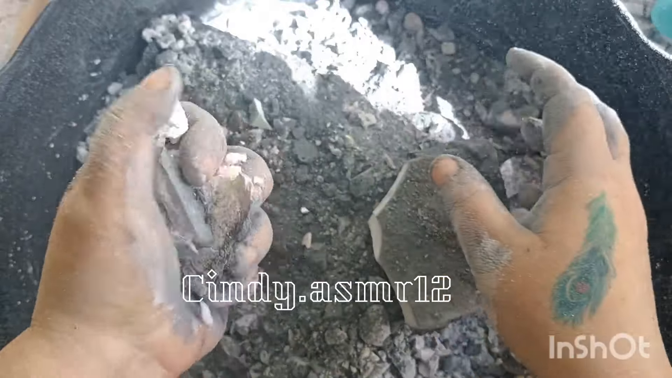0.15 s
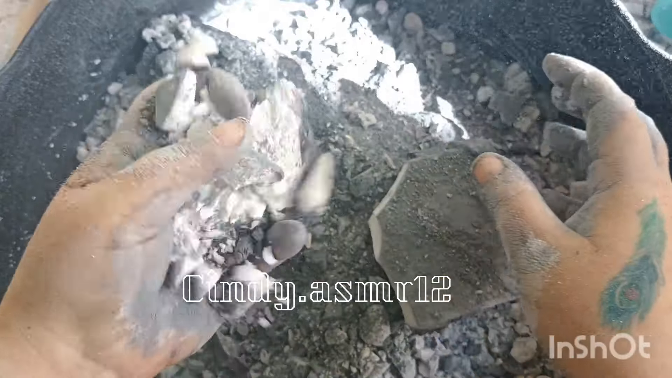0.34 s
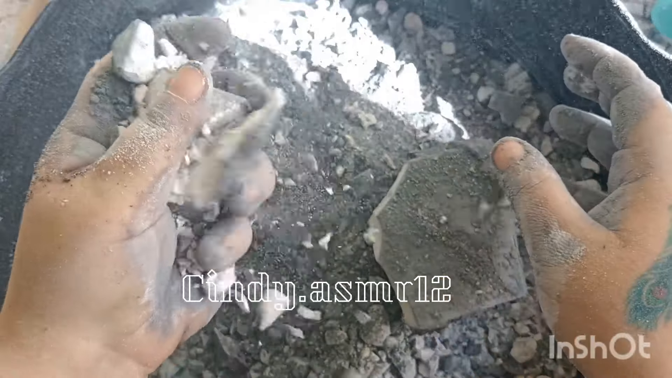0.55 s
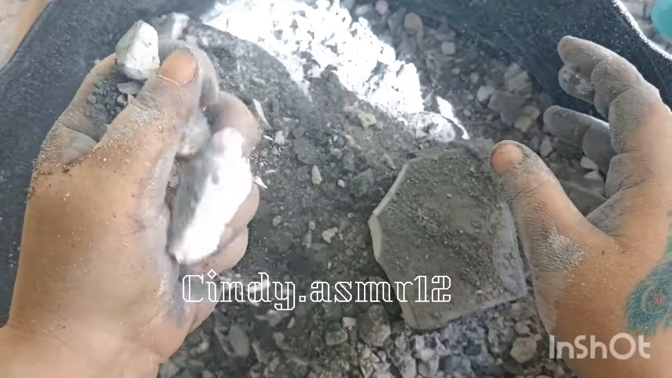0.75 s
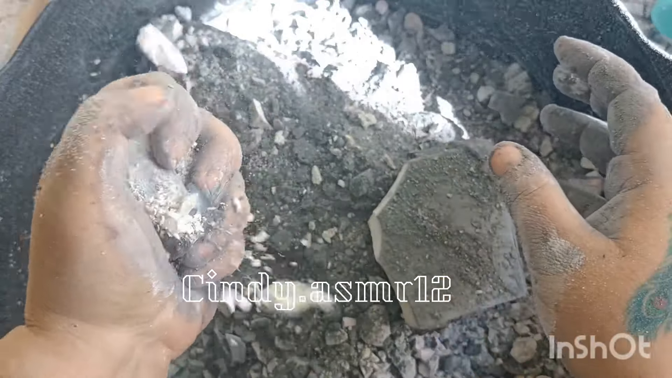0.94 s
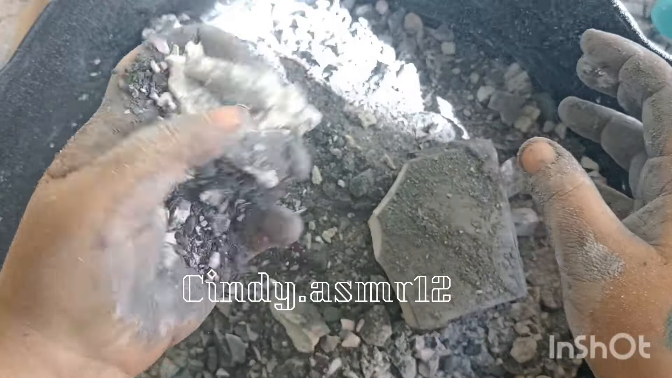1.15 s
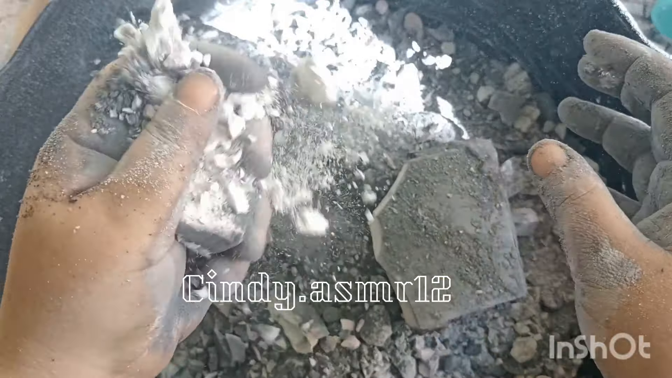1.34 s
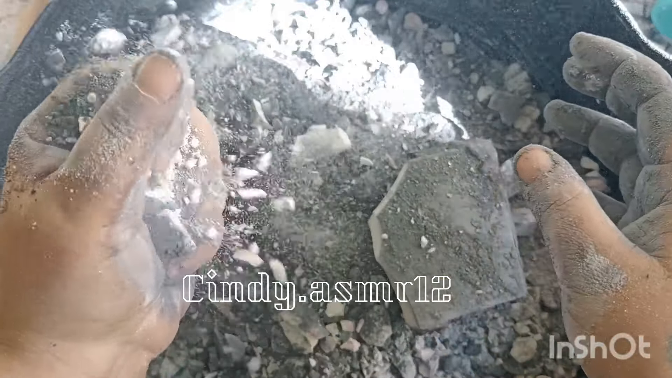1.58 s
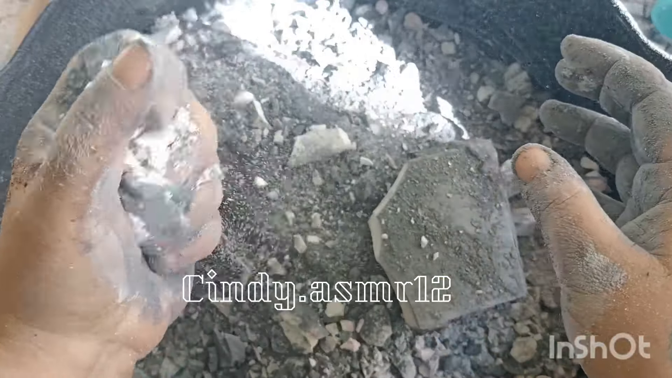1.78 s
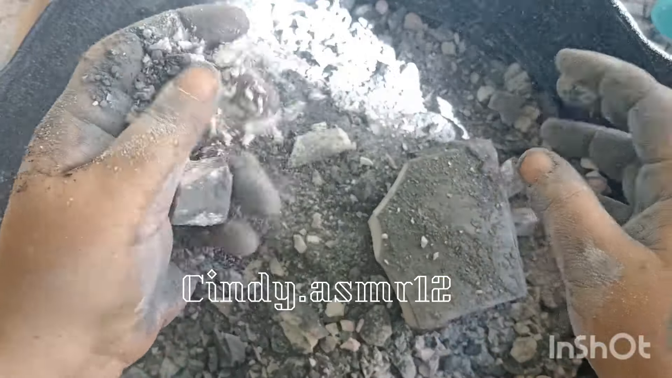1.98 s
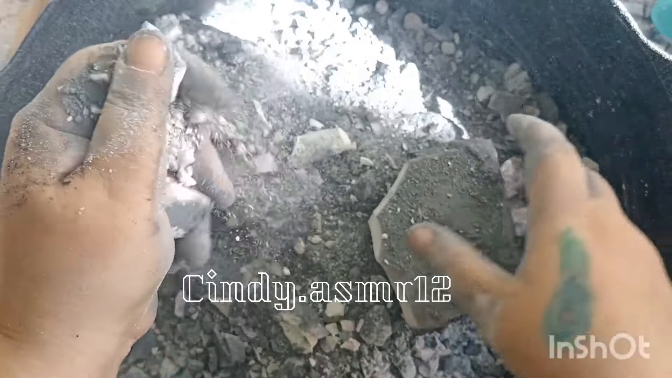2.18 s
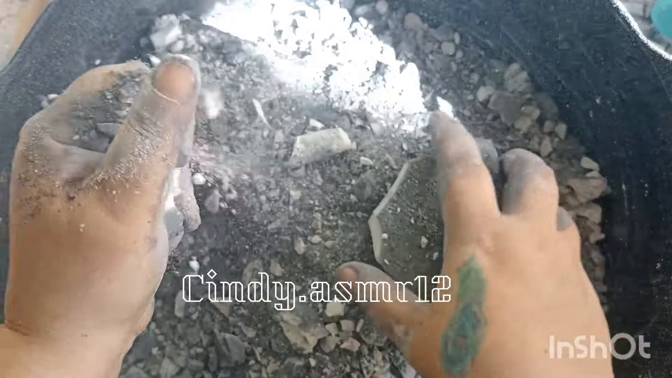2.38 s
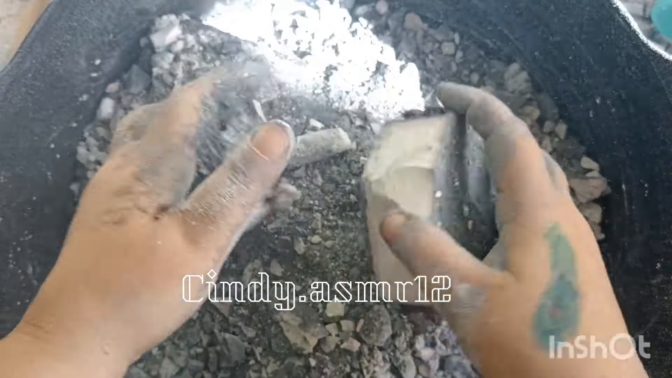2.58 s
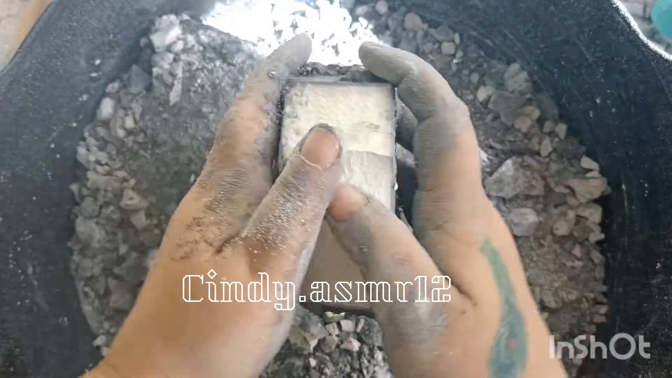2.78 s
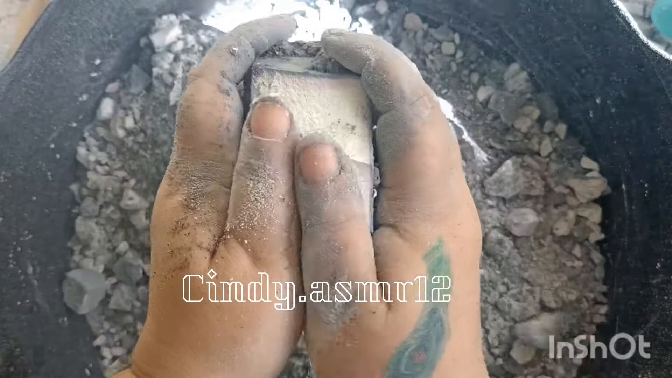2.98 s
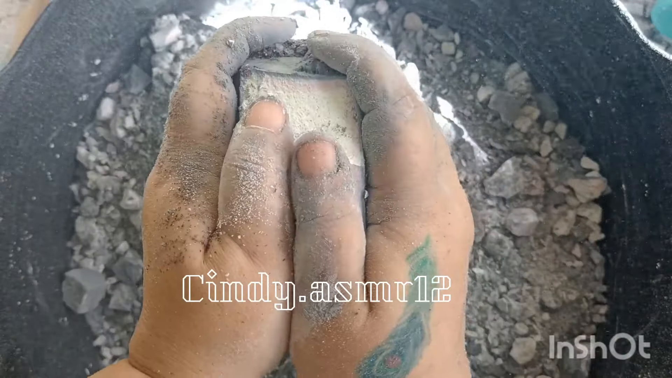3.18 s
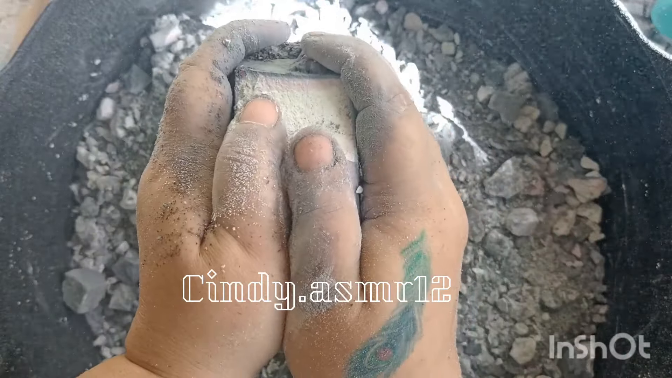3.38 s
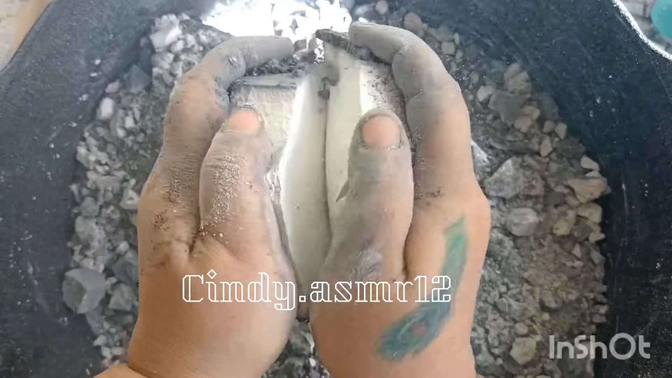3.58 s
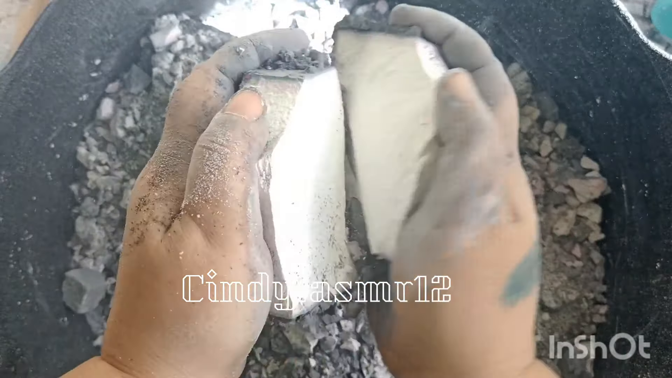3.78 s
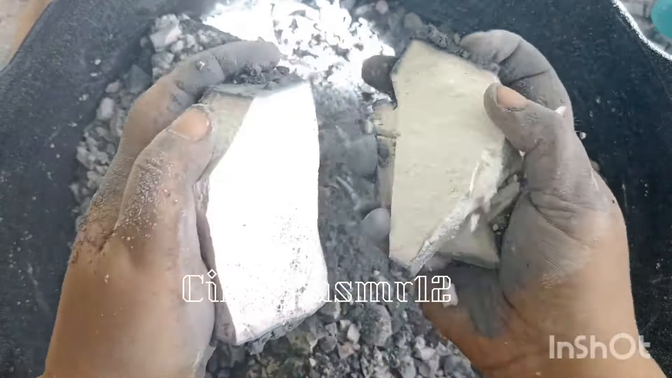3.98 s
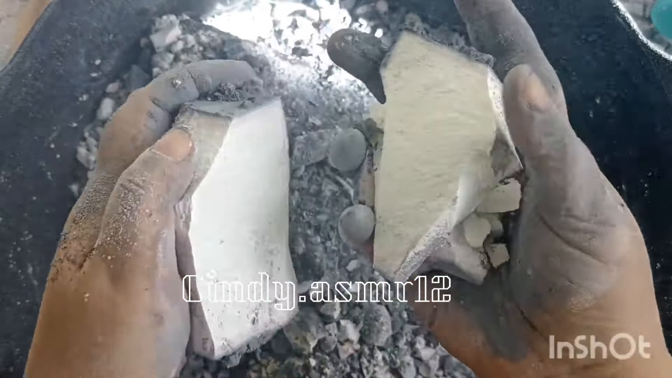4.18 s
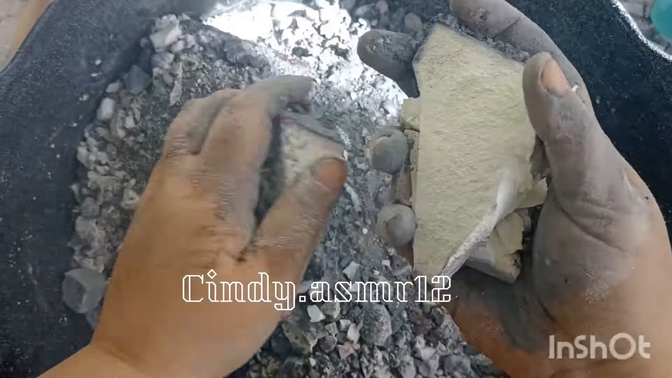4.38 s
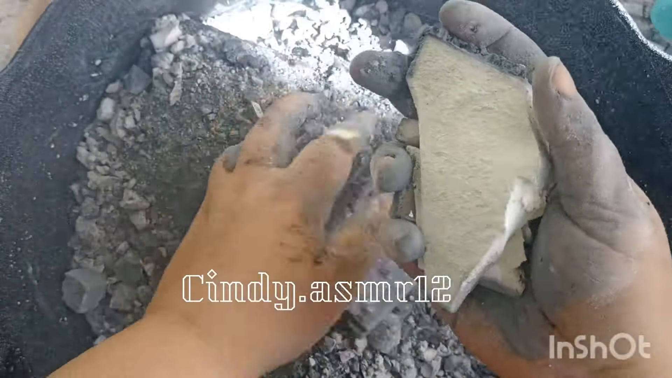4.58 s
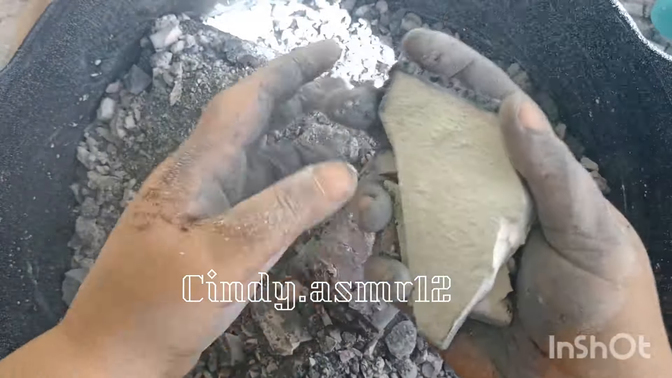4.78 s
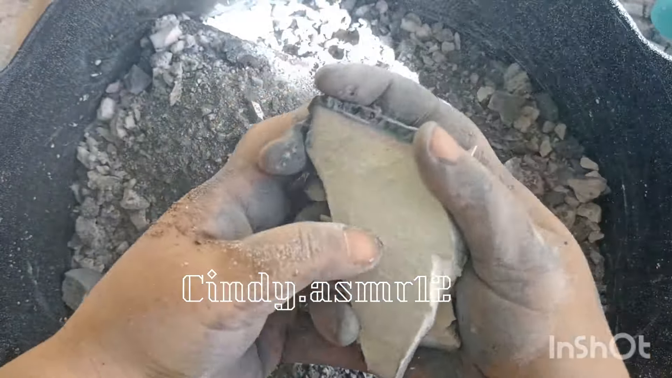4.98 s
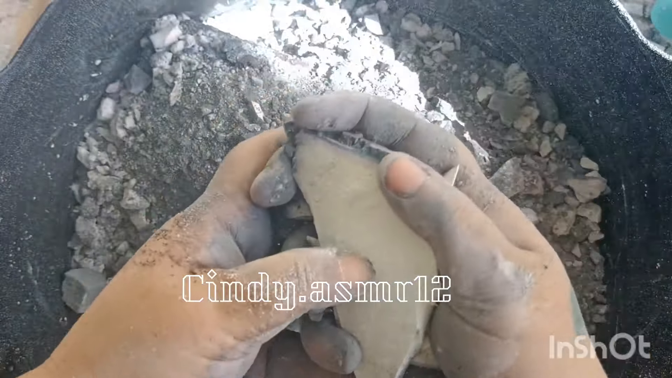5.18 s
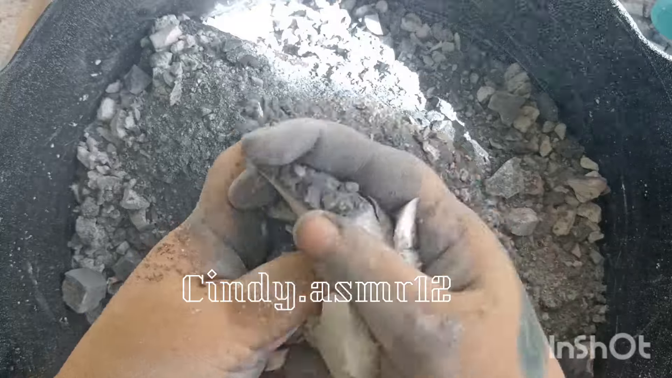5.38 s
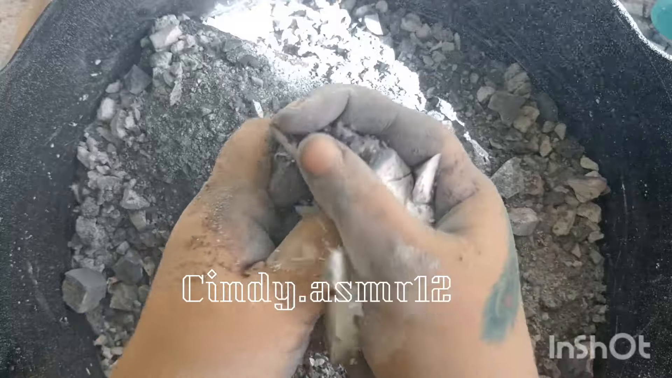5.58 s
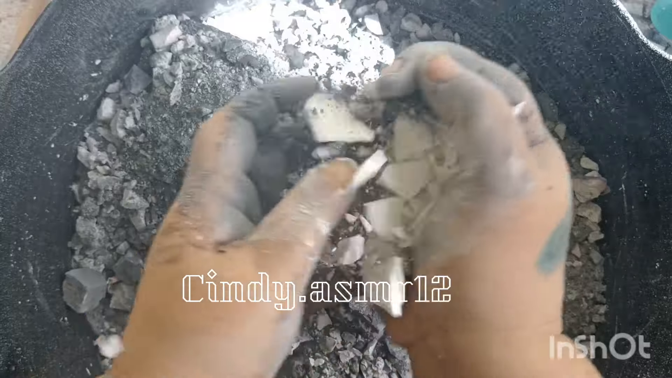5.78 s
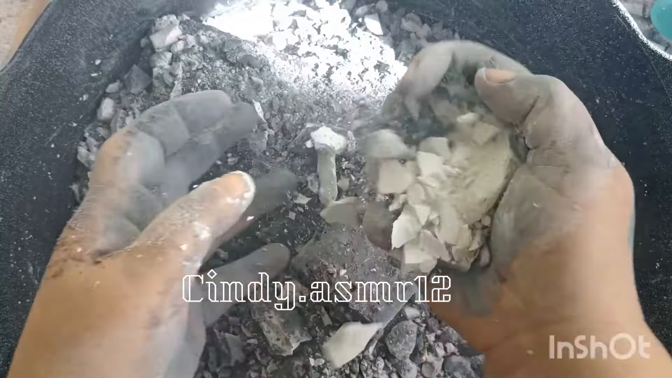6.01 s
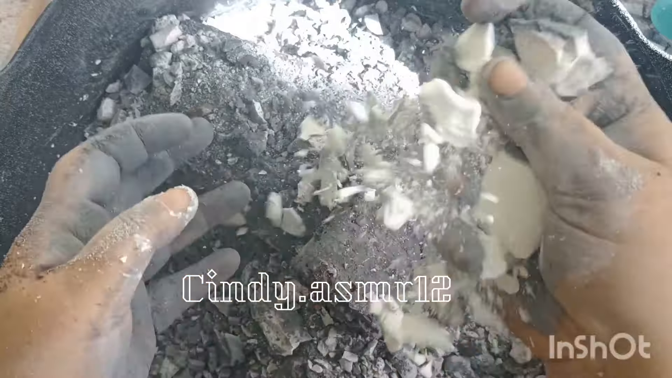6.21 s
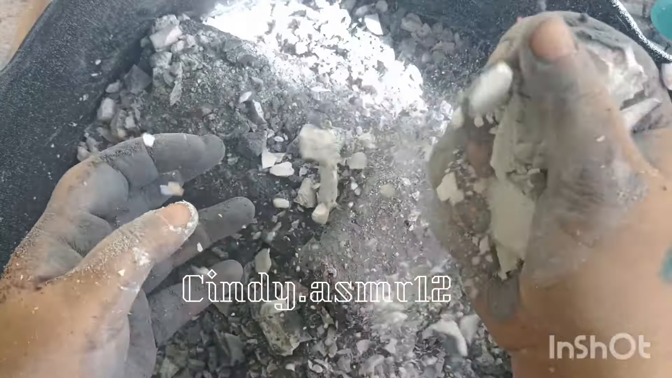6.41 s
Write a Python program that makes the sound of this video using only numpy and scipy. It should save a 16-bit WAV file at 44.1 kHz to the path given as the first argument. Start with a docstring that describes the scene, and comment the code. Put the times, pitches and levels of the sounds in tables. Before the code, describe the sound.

Dry chalk blocks are snapped and crushed by hand over a tub, with sharp cracks, gritty crumbling, powdery hiss and dull thuds of falling lumps.

```python
"""In a small room, close to the microphone, dry chalk blocks are snapped and crushed by hand over a plastic
tub. Each fracture is a sudden release and a burst of tearing noise, with a dull piece, a bright edge and shed
grains; loose pieces also clack dully against each other. Between them grit grinds and powder hisses as clumped
random clicks; flat faces squeak as wavering tones. Lumps thud into the tub through its resonances, two hard
shards clink in decaying sine modes, and filtered noise gives the rumble of the tub and the faint hiss of the
room."""
import sys
import numpy as np
from scipy import signal
from scipy.fft import rfft, irfft
from scipy.io import wavfile
from scipy.ndimage import uniform_filter1d

SR = 44100
rng = np.random.default_rng(int(sys.argv[2]) if len(sys.argv) > 2 else 0)


def to_wav(s):
    """Save 16-bit WAV."""
    ch = np.atleast_2d(s).T  # columns
    pcm = np.round(np.clip(ch, -1, 1) * 32767)  # PCM
    wavfile.write(sys.argv[1], SR, pcm.astype(np.int16))


N = 284445  # length in samples

# Fractures, and pieces of chalk knocking dully against each other (the rows with almost no edge). Each row:
# start in seconds, pitch of the piece in Hz, level of the piece in dB, level of the snapping edge in dB.
CRACKS_AND_CLACKS = [(0.0266, 2270, -23.5, -20), (0.071, 2820, -26, -19.5), (0.424, 2140, -29, -18.5),
                     (0.4645, 2070, -33, -16), (0.4684, 2700, -19, -37), (0.5289, 2000, -24, -24),
                     (0.538, 1780, -22, -19), (0.6091, 2250, -38, -21), (0.667, 1660, -28.5, -34),
                     (0.6888, 2200, -47, -25.5), (0.723, 1990, -31, -24), (0.7537, 1940, -43, -17),
                     (0.789, 1603, -20, -29), (0.835, 2800, -22, -24), (0.9496, 1677, -21, -32),
                     (1.0264, 2330, -35, -37), (1.059, 1900, -33.5, -49), (1.29, 2160, -33, -48),
                     (1.3297, 1850, -23, -27), (1.404, 1820, -14, -31), (1.415, 1850, -31, -32),
                     (1.4256, 2720, -19, -20), (1.4383, 1270, -18, -21.5), (1.5968, 2130, -47, -28),
                     (1.651, 2160, -32.5, -32), (1.74, 1770, -17, -34), (1.7896, 1490, -28, -44.5),
                     (1.9974, 2660, -15.5, -24.5), (2.033, 2600, -22, -24), (2.0685, 2240, -20.5, -22),
                     (2.142, 1410, -32.5, -33), (2.663, 1630, -18.5, -61), (2.8103, 1275, -20.5, -64),
                     (2.9056, 1810, -31, -44), (2.9302, 1420, -24.5, -49), (2.9899, 1292, -21, -57),
                     (3.4488, 2200, -10.5, -13.5), (3.4647, 2160, -28, -35), (3.4746, 1860, -13.5, -15),
                     (3.482, 1930, -26, -21), (3.6012, 1730, -25.5, -55), (3.661, 1700, -33.5, -57),
                     (3.6773, 2000, -28, -37), (4.236, 1910, -34.5, -34.5), (4.357, 2070, -31, -45),
                     (4.4638, 2020, -20, -47), (4.4752, 1880, -25, -38), (4.4826, 2000, -23.5, -37),
                     (4.4896, 1870, -21, -32.5), (4.498, 1680, -24, -43), (4.5467, 1620, -25.5, -60),
                     (4.7335, 2000, -32.5, -33.5), (5.051, 2140, -13.5, -9.5), (5.1017, 2400, -39, -13.5),
                     (5.16, 2930, -34, -14.5), (5.2163, 1816, -9.5, -11), (5.239, 2020, -13.5, -19),
                     (5.243, 1940, -16.5, -15), (5.256, 2000, -22, -14.5), (5.272, 2540, -23, -23),
                     (5.293, 2150, -33, -21.5), (5.4515, 2580, -37, -23.5), (5.458, 1760, -20, -22.5),
                     (5.5024, 2180, -20, -15.5), (5.512, 2650, -20, -36), (5.524, 2400, -32, -24),
                     (5.544, 2090, -15.5, -25), (5.5645, 2640, -19, -19.5), (5.6212, 2100, -15.5, -22.5),
                     (5.716, 2760, -36, -19.5), (5.8401, 2360, -16, -22.5), (5.876, 1660, -21, -45),
                     (5.8875, 2240, -21, -28), (5.9307, 2217, -12.5, -15.5), (6.1467, 2780, -27, -25),
                     (6.1716, 2130, -19, -17), (6.209, 2910, -30, -28), (6.392, 1460, -14.5, -24),
                     (6.4019, 1490, -20, -28), (6.409, 1320, -22, -33), (6.418, 1560, -25, -39)]
# Bright edge of breaking chalk, also the colour of powder. Each row: frequency in Hz, density in dB per Hz.
EDGE_SPECTRUM = [(3000, -2.5), (4000, -7.5), (5000, 2.5), (6200, 0.5), (7000, -5.5), (7900, -11),
                 (9200, -10.5), (12000, -18.5), (15500, -23)]
# a soft piece gives almost nothing above this multiple of its pitch
PIECE_TOP_RATIO = 1.54


def cracks(tear_t60, tear_share, piece_ratio, ring_share, ring_t60, size=2048, count=4):
    """A sudden release, then a few milliseconds of tearing: the piece knocks dully and the edge snaps brightly."""
    out, t = np.zeros(N), np.arange(size) / SR
    span = SR // 250  # levels are judged over the first 4 ms
    for s, hz, piece_db, snap_db in CRACKS_AND_CLACKS:
        force = tear_share * rng.standard_normal((2, size)) * from_db(-60 * t / tear_t60)
        force[:, 0] += 1  # the release
        piece = band(force[0], hz, piece_ratio)
        piece = rms_one(dull(piece, hz * PIECE_TOP_RATIO), span)
        snap = rms_one(colour(force[1], EDGE_SPECTRUM, size=512), span)
        # every piece has a shape, and so a few short-lived modes, of its own
        modes = hz * 2 ** rng.uniform(-0.23, 0.45, (count, 1))
        ring = np.cos(2 * np.pi * modes * t).sum(axis=0) * from_db(-60 * t / ring_t60)
        body = rms_one(piece + ring_share * ring, span)
        add(out, s, from_db(piece_db) * body + from_db(snap_db) * snap)
    return out


# Lumps and hands hitting the heap. Each row: start in seconds, pitch in Hz, level in dB,
# t60 of the settling noise in seconds.
HEAP_KNOCKS = [(0.539, 835, -27.5, 0.021), (0.618, 390, -35.5, 0.49), (0.952, 433, -35, 0.059),
               (1.156, 616, -30.5, 0.032), (1.403, 710, -29.5, 0.028), (1.741, 740, -26.5, 0.082),
               (2.568, 412, -32, 0.29), (2.81, 486, -28.5, 0.22), (2.931, 454, -22.5, 0.1),
               (2.933, 840, -26.5, 0.16), (2.991, 524, -15.5, 0.059), (2.99, 190, -23, 0.15),
               (2.993, 332, -15.5, 0.04), (3.191, 445, -35, 0.049), (3.447, 510, -32, 0.035),
               (3.474, 406, -27, 0.045), (3.719, 890, -33, 0.078), (3.909, 700, -35, 0.034),
               (4.243, 715, -38.5, 0.027), (4.4633, 393, -25.5, 0.092), (4.48, 325, -21.5, 0.052),
               (4.495, 235, -30.5, 0.34), (4.496, 73.5, -36, 0.5), (4.546, 730, -26, 0.069),
               (4.697, 860, -40, 0.035), (4.7329, 683, -30, 0.013), (5.238, 368, -26, 0.049),
               (5.928, 930, -26, 0.086), (6.178, 568, -17, 0.095), (6.394, 540, -25, 0.11)]
# Resonances of the filled tub. Each row: frequency in Hz, width in Hz, gain in dB.
TUB_RESONANCES = [(190, 135, 3.5), (323, 45, 3.5), (390, 26, -6.5)]


def knocks(settle_share, band_ratio, clunk_share, size=8192):
    """A lump lands with a short hollow clunk and settles in the heap; the blow rings in the tub."""
    out, t = np.zeros(N), np.arange(size) / SR
    for s, hz, level_db, t60 in HEAP_KNOCKS:
        force = settle_share * rng.standard_normal(size) * from_db(-60 * t / t60)
        force[0] += 1  # the impact
        blow = dull(band(force, hz, band_ratio), hz * 2)
        blow = blow + clunk_share * resonate(blow, hz, hz / 5)
        tub = sum(from_db(db) * resonate(blow, f, width) for f, width, db in TUB_RESONANCES)
        add(out, s, from_db(level_db) * rms_one(blow + tub, SR // 50))
    return out


# Hard shards touching. Each row: start in seconds, level in dB.
SHARD_CLINKS = [(5.8765, -24), (5.888, -20)]
# Modes of a struck shard. Each row: frequency in Hz, level in dB, t60 in seconds.
SHARD_MODES = [(2000, 0, 0.013), (3305, 0.5, 0.026), (5340, 1, 0.023), (7330, 1.5, 0.064)]


def clinks():
    """A hard shard rings briefly in its own modes."""
    out, t = np.zeros(N), np.arange(SR // 8) / SR
    ring = sum(from_db(db - 60 * t / t60) * np.sin(2 * np.pi * hz * t) for hz, db, t60 in SHARD_MODES)
    for s, level_db in SHARD_CLINKS:
        add(out, s, from_db(level_db) * ring)
    return out


# Squeezes of the hand. Each row: time of full strength in seconds, hold in seconds, level of grit in dB,
# level of powder in dB, level of coarse crumbs in dB.
HAND_SQUEEZES = [(0.0, 0.05, -43, -39, -52.5), (0.31, 0.53, -44, -50, -50.5), (0.425, 0.072, -34, -32, -37),
                 (0.56, 0.076, -40, -39.5, -40), (0.687, 0.12, -36, -36, -45.5),
                 (0.945, 0.0049, -44.5, -45, -48), (1.019, 0.012, -46, -53, -44.5),
                 (1.145, 0.094, -50.5, -55.5, -46.5), (1.264, 0.12, -36, -42.5, -43.5),
                 (1.419, 0.056, -35.5, -35, -38), (1.591, 0.098, -44, -49, -48.5),
                 (1.984, 0.17, -40, -44, -43), (2.438, 0.014, -49.5, -50.5, -40.5),
                 (2.544, 0.037, -36, -42, -36), (2.646, 0.13, -47, -57, -43.5),
                 (3.447, 0.062, -24, -29.5, -35), (3.538, 0.2, -42, -48.5, -53.5),
                 (3.806, 0.085, -35, -35, -48), (4.024, 0.037, -43, -46.5, -46.5),
                 (4.456, 0.03, -37, -46, -36), (4.993, 0.0057, -42.5, -41.5, -50),
                 (5.055, 0.12, -32, -31.5, -57), (5.217, 0.06, -24, -28.5, -40.5),
                 (5.3, 0.16, -41, -41.5, -54), (5.42, 0.14, -38, -38.5, -43.5),
                 (5.501, 0.071, -31.5, -29, -47), (5.623, 0.098, -37, -40.5, -74),
                 (5.926, 0.061, -38, -40, -41), (6.103, 0.49, -35.5, -37.5, -42.5),
                 (6.169, 0.082, -36.5, -43, -36), (6.39, 0.06, -33.5, -40, -37)]
# dusty fingers never quite rest: level of each grain size between squeezes (dB)
RESTLESS_DB = -64.5


def grinding():
    """Strength of grit, powder and coarse crumbs; overlapping squeezes add in power."""
    rows = np.array(HAND_SQUEEZES)
    power = np.array([effort(start, hold) for start, hold in rows[:, :2]]) ** 2
    grain_power = from_db(rows[:, 2:]).T ** 2
    return np.sqrt(grain_power @ power + from_db(RESTLESS_DB) ** 2)


# every squeeze builds up, eases as the chalk gives way, then trickles out; a long squeeze builds more slowly
BUILD_DB_PER_HOLD, EASE_DB_PER_S, TRICKLE_DB_PER_S = 167, 11.5, 218


def effort(start, hold):
    """Gain of one push of the hand over time: build-up to the start, easing hold, release."""
    t = np.arange(N) / SR - start
    build = BUILD_DB_PER_HOLD * np.minimum(t / hold, 0)
    ease = EASE_DB_PER_S * np.clip(t, 0, hold)
    trickle = TRICKLE_DB_PER_S * np.maximum(t - hold, 0)
    return from_db(np.maximum(build - ease - trickle, -120))


# Colour of the coarse crumbs. Each row: frequency in Hz, density in dB per Hz.
CRUMB_SPECTRUM = [(200, 3), (340, -4), (1000, -2), (1400, -1.5)]
# Colour of the grit. Each row: frequency in Hz, density in dB per Hz.
GRIT_SPECTRUM = [(800, -17), (1200, -12), (1750, 1), (2400, -1.5), (3300, -5.5), (4100, -6.5),
                 (5200, -12.5)]


def crumbling(grit_flow, powder_flow, crumb_flow, shed_db, shed_t60):
    """Three grain sizes follow the squeeze; each fracture or clack crackles as it starts to yield and then
    sheds grains."""
    yield_s = .002  # the crackle swells for this long before the fracture
    t = np.arange(SR // 4) / SR - yield_s
    swell = np.minimum(1 + t / yield_s, 1) ** 2
    spray = from_db(shed_db - 60 * np.maximum(t, 0) / shed_t60) * swell
    shed_grit, shed_powder = np.zeros((2, N))
    for s, _, piece_db, snap_db in CRACKS_AND_CLACKS:
        add(shed_grit, s - yield_s, from_db(piece_db) * spray)
        add(shed_powder, s - yield_s, from_db(snap_db) * spray)
    ticks = chips(per_s=90)
    crumbs = grains(CRUMB_SPECTRUM, .5 * ticks, per_s=420, spread_db=3.6, clump_db=3.0, dust_db=-3)
    grit = grains(GRIT_SPECTRUM, ticks, per_s=800, spread_db=4.8, clump_db=4.0, dust_db=-8)
    powder = grains(EDGE_SPECTRUM, ticks, per_s=1500, spread_db=4.6, clump_db=4.0, dust_db=-4)
    return (crumbs * np.hypot(crumb_flow, 0.028 * shed_grit)
            + grit * np.hypot(grit_flow, shed_grit)
            + powder * np.hypot(powder_flow, shed_powder))


def grains(spectrum, ticks, per_s, spread_db, clump_db, dust_db, count=24):
    """Clumps of tiny dry breaks, each hinting at a pitch, with lone ticks over finer dust; steady level."""
    cycles, patchy_db = 3.2, 3.5  # resonance sharpness, wander of each pitch
    sizes = from_db(spread_db * np.minimum(rng.exponential(1, N), 4.5)) * rng.choice([-1, 1], N)
    clumps = from_db(clump_db * drift(170))
    clicks = sizes * clumps * (rng.random(N) < per_s / SR)
    dealt = rng.integers(0, count, N)  # which pitch each click gets
    rings = np.zeros(N)
    for k, hz in enumerate(np.geomspace(spectrum[1][0], spectrum[-2][0], count)):
        share = clicks * (dealt == k) * from_db(patchy_db * drift(30))
        rings += resonate(share, hz, hz / cycles) / np.sqrt(hz)
    dust = from_db(dust_db) * rng.standard_normal(N)
    sound = colour(.5 * rms_one(rings) + rms_one(clicks) + ticks + dust, spectrum)
    # even out the level over about 45 ms
    return sound / np.sqrt(uniform_filter1d(sound ** 2, size=2000) + 1e-12)


def chips(per_s):
    """Lone small chips breaking off at random, each a single sharp tick; rms 1."""
    return rms_one((rng.random(N) < per_s / SR) * rng.standard_normal(N))


# Flat faces of chalk sliding over each other. Each row: middle in seconds, half-length in seconds,
# pitch at the middle in Hz, level at the middle in dB.
FACE_RUBS = [(0.972, 0.027, 5950, -64), (1.028, 0.0031, 5400, -31.5), (1.07, 0.11, 5300, -59),
             (2.771, 0.098, 5500, -50.5), (2.826, 0.014, 6300, -41.5), (3.875, 0.029, 5600, -34),
             (4.202, 0.036, 5370, -44.5)]


def rubs(width_hz, sag_octaves_per_s, overtone_ratio, overtone_db):
    """Chalk sliding on chalk gives a breathy squeak with one overtone; its pitch sags as the slide goes on."""
    out, t = np.zeros(N), np.arange(-SR // 4, SR // 4) / SR
    for s, half, hz, db in FACE_RUBS:
        phase = 2 * np.pi * np.cumsum(hz * 2 ** (-sag_octaves_per_s * t)) / SR
        noise = rng.standard_normal((2, len(t))) + 1j * rng.standard_normal((2, len(t)))
        grip = dull(noise, width_hz, order=2)  # slow random wavering makes the tone breathy
        tone = grip[0] * np.exp(1j * phase)
        overtone = from_db(overtone_db) * grip[1] * np.exp(1j * overtone_ratio * phase)
        squeak = rms_one((tone + overtone).real)
        add(out, s + t[0], from_db(db) * squeak * np.exp(-(t / half) ** 2))
    return out


# The hands shove the heap. Each row: time of full strength in seconds, hold in seconds, level in dB.
HEAP_SHOVES = [(0.482, 0.09, -43.5), (1.109, 0.14, -42), (2.668, 0.12, -39.5), (2.965, 0.086, -39.5),
               (3.154, 0.16, -44.5), (3.441, 0.017, -32.5)]
# Colour of the tub's rumble. Each row: frequency in Hz, density in dB per Hz.
RUMBLE_SPECTRUM = [(45, -10), (72, 2.5), (110, 2.5), (190, -2.5)]
# rumble of the tub: at rest (dB), under falling crumbs (dB against their level)
TUB_REST_DB, TUB_CRUMBS_DB = -55, -19.5


def rumble(crumb_flow):
    """The heap shifts in lurches when it is shoved and when crumbs fall on it."""
    shoved = sum((from_db(db) * effort(start, hold)) ** 2 for start, hold, db in HEAP_SHOVES)
    level = np.sqrt(from_db(TUB_REST_DB) ** 2 + (from_db(TUB_CRUMBS_DB) * crumb_flow) ** 2 + shoved)
    lurches = from_db(2.44 * drift(35))
    return level * rms_one(colour(rng.standard_normal(N) * lurches, RUMBLE_SPECTRUM))


def reflect(x, echo_db, farthest_s, count=9):
    """A handful of early reflections that come and go as the fingers move, so the colour keeps shifting."""
    out = x.copy()
    for lag in np.geomspace(farthest_s / 10, farthest_s, count) * rng.uniform(0.78, 1.12, count):
        add(out, lag, from_db(echo_db) * drift(7) * x)
    return out


# Decay of the room. Each row: frequency in Hz, t60 in seconds.
ROOM_DECAY = [(200, 0.2), (4000, 0.27), (14000, 0.085)]


def room(x, first_s, count=8):
    """Diffuse reflections arrive after a short gap and die band by band."""
    t = np.arange(SR // 2) / SR
    tail = np.zeros(len(t))
    for hz in np.geomspace(100, 12800, count):  # octave bands
        noise = band(rng.standard_normal(len(t)), hz, np.sqrt(2))
        tail += noise * from_db(-60 * t / at_hz(ROOM_DECAY, hz))
    tail *= np.clip(t / first_s - .5, 0, 1)
    return signal.fftconvolve(x, tail / np.sqrt(np.sum(tail ** 2)))[:N]


# Steady room hiss. Each row: frequency in Hz, density in dB per Hz.
AIR_SPECTRUM = [(300, 7.5), (2200, -5.5), (6000, -19.5), (15000, -29)]
AIR_DB = -56.5


def air():
    """Faint smooth hiss of the room, as steady coloured noise."""
    return from_db(AIR_DB) * rms_one(colour(rng.standard_normal(N), AIR_SPECTRUM))


def from_db(db):
    """Turn dB into an amplitude factor."""
    return 10 ** (np.asarray(db) / 20)


def rms_one(x, span=None):
    """Scale to rms 1, judged over the first span samples."""
    return x / np.sqrt(np.mean(x[:span] ** 2) + 1e-20)


def at_hz(points, hz):
    """Read a table on a log-frequency axis."""
    f, value = np.transpose(points)
    return np.interp(np.log(np.maximum(hz, 1)), np.log(f), value)


def add(out, s, sound):
    """Mix a sound in at time s."""
    i = int(np.clip(round(s * SR), 0, N - 1))
    out[i:i + len(sound)] += sound[:N - i]


def band(x, hz, ratio):
    """Band-pass from hz / ratio to hz * ratio."""
    ratio = max(ratio, 1.05)
    edges = [hz / ratio, min(hz * ratio, .45 * SR)]
    return signal.sosfilt(signal.butter(2, edges, "band", fs=SR, output="sos"), x + 1e-18)


def dull(x, hz, order=4):
    """Low-pass at hz."""
    return signal.sosfilt(signal.butter(order, min(hz, .45 * SR), fs=SR, output="sos"), x)


def resonate(x, hz, width_hz):
    """Two-pole resonance with gain close to 1 on top."""
    r = np.exp(-np.pi * width_hz / SR)
    zeros = [(1 - r * r) / 2, 0, (r * r - 1) / 2]
    poles = [1, -2 * r * np.cos(2 * np.pi * hz / SR), r * r]
    return signal.lfilter(zeros, poles, x + 1e-18)


def colour(x, spectrum, size=4096):
    """Causal (minimum-phase) filter with the given spectrum, falling away beyond both ends."""
    hz = np.maximum(np.fft.rfftfreq(size, 1 / SR), 10)
    octaves_outside = np.abs(np.log2(hz / np.clip(hz, spectrum[0][0], spectrum[-1][0])))
    gain_db = at_hz(spectrum, hz) - 20 * np.minimum(octaves_outside, 2)
    # folding the cepstrum forward in time makes the filter minimum-phase
    cepstrum = irfft(np.log(from_db(gain_db)))
    cepstrum[1:size // 2] *= 2
    cepstrum[size // 2 + 1:] = 0
    return signal.fftconvolve(x, irfft(np.exp(rfft(cepstrum))))[:len(x)]


def drift(rate):
    """Random wander of spread 1 at its knots, rate knots a second, joined by straight lines."""
    knots = rng.standard_normal(N // 20)
    return np.interp(np.arange(N) / SR * rate, np.arange(len(knots)), knots)


def scene():
    """Cracks, knocks and grinding over the tub, in a small room."""
    grit_flow, powder_flow, crumb_flow = grinding()
    hits = cracks(tear_t60=.007, tear_share=0.22, piece_ratio=1.63, ring_share=0.11, ring_t60=0.21)
    hits = hits + knocks(settle_share=.065, band_ratio=1.67, clunk_share=1.4) + clinks()
    friction = crumbling(grit_flow, powder_flow, crumb_flow, shed_db=-11.5, shed_t60=0.026)
    friction = friction + rubs(width_hz=370, sag_octaves_per_s=1.2, overtone_ratio=1.88, overtone_db=-16.5)
    # grit is ground inside the cupped hands, which colour it; hits bounce off the wall of the tub
    in_hands = reflect(friction, echo_db=-8.0, farthest_s=.005)
    in_tub = reflect(hits, echo_db=-17.0, farthest_s=.017)
    chalk = in_hands + in_tub
    return (chalk + from_db(-14.5) * room(chalk, first_s=0.0047) + rumble(crumb_flow) + air())[None]


CUTOFF_HZ = 15700


def record(dry):
    """The sharpest peaks overload softly; the deep bass and the top are cut."""
    rounded = dry / (1 + dry ** 6) ** (1 / 6)
    thinned = signal.sosfilt(signal.butter(2, 45, "high", fs=SR, output="sos"), rounded)
    return signal.sosfilt(signal.ellip(10, .2, 80, CUTOFF_HZ, fs=SR, output="sos"), thinned)


dry = scene()
out = record(dry)
to_wav(out)
```